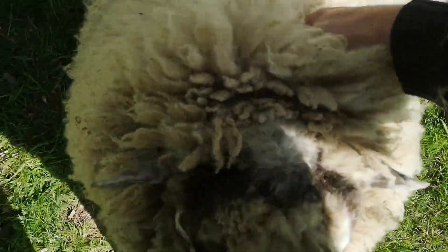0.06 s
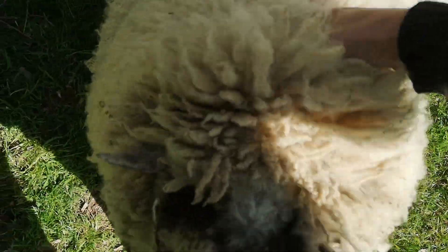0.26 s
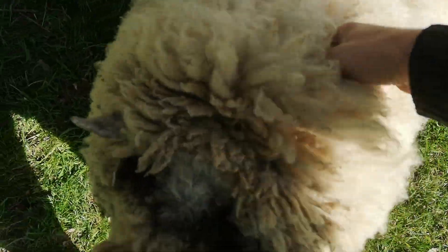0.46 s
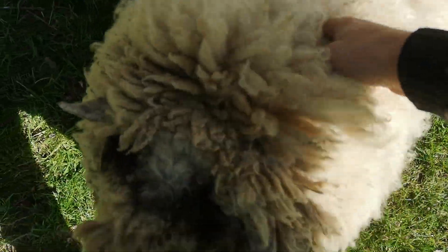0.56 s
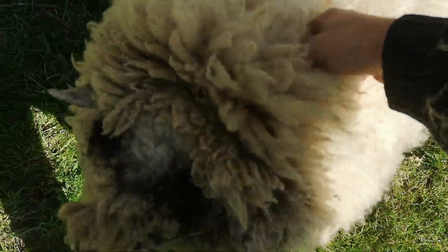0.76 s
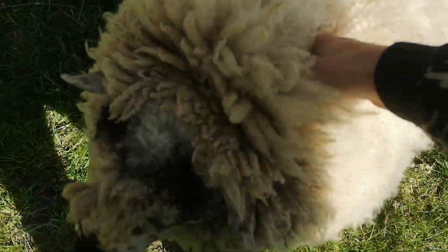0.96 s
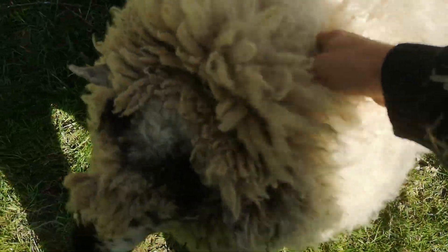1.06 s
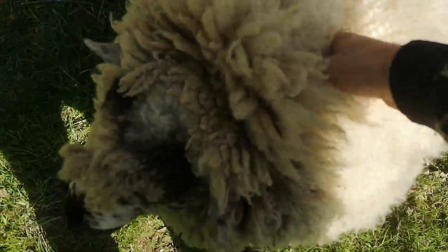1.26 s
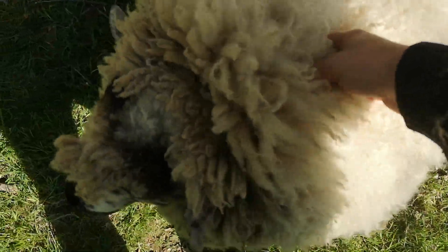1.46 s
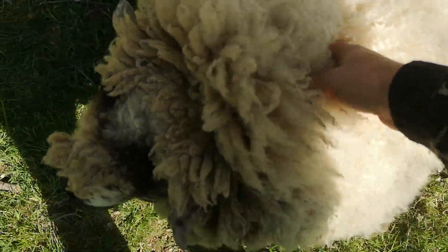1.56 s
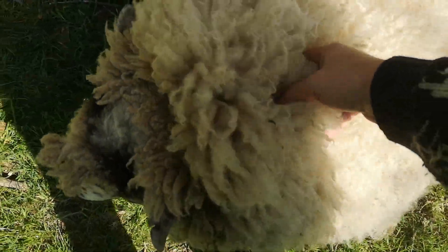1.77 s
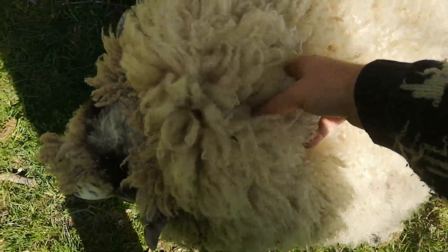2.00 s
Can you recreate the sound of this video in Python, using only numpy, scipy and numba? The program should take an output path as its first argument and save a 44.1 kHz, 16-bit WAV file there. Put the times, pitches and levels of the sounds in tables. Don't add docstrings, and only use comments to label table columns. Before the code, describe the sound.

A sheep gives one rough, trembling bleat of about a second right at the start, close to a handheld microphone in an open pasture; low wind rumble and soft knocks continue, with a sharper bump near the end.

```python
import sys
import numpy as np
from scipy import signal
from scipy.fft import rfft, irfft
from scipy.io import wavfile
from scipy.ndimage import uniform_filter1d, map_coordinates
from numba import njit

SR = 44100
rng = np.random.default_rng(int(sys.argv[2]) if len(sys.argv) > 2 else 0)


def field_ratio(decibels):
    return 10 ** (np.asarray(decibels, dtype=float) / 20)


def wav_record(signal):
    frames = np.transpose(np.atleast_2d(signal))
    bounded = np.clip(frames, -1, 1)
    quanta = np.round(bounded * 32767).astype(np.int16)
    wavfile.write(sys.argv[1], SR, quanta)


N = 89743
T = np.arange(N) / SR

# t/s, pulse rate f/Hz, effort level/dB, mouth resonance f/Hz, chest share level/dB
BLEAT = [
    (.06, 161.5, -46.5, 2160, -9.5),
    (.2, 172.6, -57.5, 2275, -9),
    (.3, 175.3, -54.5, 2260, 2),
    (.42, 180.4, -59, 2440, -4),
    (.55, 181.5, -58.5, 2466, -0.5),
    (.66, 178.9, -58, 2530, 6),
    (.75, 170.4, -61.5, 2790, 6.5),
    (.84, 167.8, -65.5, 2380, 11.5),
    (.99, 164.7, -52.5, 2104, 6),
]
MOUTH_WIDTH_HZ = 620


def level(x, db):
    return x * field_ratio(db) / np.sqrt(np.mean(x ** 2))


def curve(table, column=1):
    table = np.array(table, float)
    return np.interp(T, table[:, 0], table[:, column])


@njit
def svf(x, hz, width):
    y, b, l = np.empty(len(x)), 0., 0.
    for i in range(len(x)):
        g, k = np.tan(np.pi * hz[i] / SR), width / hz[i]
        v = (b + g * (x[i] - l)) / (1 + g * (g + k))
        b, l, y[i] = 2 * v - b, l + 2 * g * v, k * v
    return y


def band(x, hz, width_hz):
    hz = hz + np.zeros(N)
    return svf(svf(x, hz, 1. * width_hz), hz, 1. * width_hz)


def walk(rate):
    k = int(SR / rate)
    steps = np.repeat(rng.standard_normal(N // k + 1), k)
    return 0.88 * uniform_filter1d(uniform_filter1d(steps, k), k)[:N]


def coloured(colour, flicker_db, rate):
    colour, f = np.array(colour, float), np.fft.rfftfreq(N, 1 / SR) + 1
    gain_db = np.interp(np.log(f), np.log(colour[:, 0]), colour[:, 1])
    shaped = rfft(rng.standard_normal(N)) * field_ratio(gain_db)
    half_octave = 2 * np.log2(f / 16)
    out = 0
    for k in range(22):
        share = np.clip(1 - abs(half_octave - k), 0, 1)
        out = out + irfft(shaped * share, N) * field_ratio(flicker_db * walk(rate))
    return level(out, 0)


def late(x):
    return map_coordinates(x, [np.arange(N) - .00078 * SR], mode="mirror")


@njit
def folds(hz, stretch, size):
    pulses, phase, p, k = np.zeros(len(hz) + 1), np.empty(len(hz)), 0., 0
    for i in range(len(hz)):
        step = hz[i] * stretch[k] / SR
        p += step
        if p >= 1:
            p, k = p - 1, k + 1
            pulses[i] += size[k] * p / step
            pulses[i + 1] += size[k] * (1 - p / step)
        phase[i] = p
    return pulses[:-1], phase


def glottis(tremble):
    jitter, shimmer_db, breath_db, tremble_pitch = .017, 2.5, -4, .01
    chance = rng.standard_normal((600, 2)).T
    rate_hz = curve(BLEAT) * (1 + tremble_pitch * tremble)
    pulses, phase = folds(rate_hz, 1 + jitter * chance[0], field_ratio(shimmer_db * chance[1]))
    breath = np.exp(-phase / .5) * rng.standard_normal(N)
    return level(pulses - pulses.mean(), 0) + level(breath, breath_db)


def vocal_tract(source):
    # f/Hz, width f/Hz, level/dB
    throat = [
        (500, 81, -13.5),
        (1180, 170, -11),
        (1550, 220, -32),
    ]
    air_db, lips_db, tongue_db, lips_open_s = -36.5, -3, 1, .3
    mouth_hz = curve(BLEAT, column=3)
    mouth = band(band(source, mouth_hz, MOUTH_WIDTH_HZ), mouth_hz, 1400)
    air = field_ratio(air_db) * band(source, 5400, 2700)
    lips = field_ratio(lips_db) * band(source, 1.14 * mouth_hz, 340)
    tongue = field_ratio(tongue_db) * band(source, 2060, 300)
    opened = np.clip((T - BLEAT[0][0]) / lips_open_s, 0, 1) ** 2
    chest = 0
    for hz, width, db in throat:
        chest = chest + field_ratio(db) * np.sqrt(MOUTH_WIDTH_HZ / width) * band(source, hz, width)
    return mouth + air - opened * (lips + tongue) + chest * field_ratio(curve(BLEAT, column=4))


def scatter(voice):
    scatter_db, t60_s = 7, .075
    shade_hz, shade_width_hz, shade_db = 2520, 420, 3
    lag = np.arange(SR // 5) / SR
    tail = rng.standard_normal((2, len(lag))) * field_ratio(-60 * lag / t60_s)
    tail = tail / np.sqrt((tail ** 2).sum(axis=1, keepdims=True)) * field_ratio(scatter_db)
    heard = np.array([late(voice), voice]) + signal.fftconvolve(voice[None], tail)[:, :N]
    favoured = svf(heard[1], np.full(N, 1. * shade_hz), 1. * shade_width_hz)
    heard[1] = level(heard[1] + field_ratio(shade_db) * favoured, 0) * heard[1].std()
    return heard


def chest_hum():
    # t/s, f/Hz, level/dB
    hum_line = [
        (.34, 190, -57),
        (.43, 202.7, -57),
        (.52, 200.7, -66),
        (.61, 195.6, -59),
        (.72, 196, -59),
    ]
    fade = np.clip(np.minimum(T - hum_line[0][0], hum_line[-1][0] - T) / 0.049, 0, 1)
    loudness = field_ratio(curve(hum_line, column=2) + 2.89 * walk(22))
    cycles = np.cumsum(curve(hum_line) * (1 + .025 * walk(18))) / SR
    hum = np.sqrt(2) * fade * loudness * np.sin(2 * np.pi * cycles)
    return np.array([late(hum), hum])


def sheep():
    tremble_hz, tremble_peak_s, tremble_from_s, tremble_db = 16.2, .538, .238, 11
    flutter_hz, flutter_peak_s, flutter_db = 29, .2, 8
    effort_rise_s, effort_fall_s, pan_db = .2, .27, 5
    full = np.clip((T - tremble_from_s) / 0.036, 0, 1)
    tremble = (1.3 - 2 * abs(np.sin(np.pi * tremble_hz * (T - tremble_peak_s)))) * full
    flutter = np.cos(2 * np.pi * flutter_hz * (T - flutter_peak_s)) * (1 - full)
    rise = np.clip((T - BLEAT[0][0]) / effort_rise_s, 0, 1)
    fall = np.clip((BLEAT[-1][0] - T) / effort_fall_s, 0, 1)
    effort_db = curve(BLEAT, column=2) + tremble_db / 2 * tremble + flutter_db / 2 * flutter
    voice = level(vocal_tract(glottis(tremble)), 0) * rise * fall * field_ratio(effort_db)
    pan = field_ratio(np.array([[1], [-1]]) * pan_db / 2 - 6)
    return scatter(voice) * pan + chest_hum()


def knocks():
    # t/s, peak level/dB, push length t/s
    pushes = [(0.067, -32, 0.014), (0.11, -32.5, 0.02), (0.133, -38, 0.013), (0.206, -31, 0.024),
              (0.264, -25, 0.012), (0.282, -23.5, 0.0051), (.722, -26, .012), (.741, -29, 0.0063),
              (0.777, -25, 0.014), (0.801, -31, 0.015), (0.838, -25, 0.0091), (0.853, -19.5, 0.0068),
              (0.885, -19.5, 0.016), (1.132, -32, .012), (1.889, -25, 0.0089), (1.909, -17, 0.0048),
              (1.924, -24, 0.013), (1.961, -32, 0.012), (1.969, -26.5, 0.0036)]
    ring_width, edge_db, edge_share = 1, -13, 0.33
    out = 0
    for at, db, length in pushes:
        u = (T - at) / length
        swing = np.cos(np.pi * u) * np.exp(-(u / ring_width) ** 2)
        edge = field_ratio(edge_db) * np.exp(-(u / edge_share) ** 2)
        out = out - field_ratio(db) * (swing + edge)
    return out


def body_rattle():
    # t/s, level/dB, decay t/s
    rattles = [
        (.003, -46, 0.016),
        (0.264, -49, 0.034),
        (.85, -49, 0.0095),
        (1.876, -38.5, .035),
        (1.96, -56, 0.011),
    ]
    shake = 0
    for at, db, decay in rattles:
        attack = np.clip((T - at) / 0.0013, 0, 1)
        shake = shake + field_ratio(db) * attack * np.exp(-np.clip(T - at, 0, None) / decay)
    return shake * level(band(rng.standard_normal(N), 235, 132), 0)


def rumble():
    # t/s, level/dB
    gust = [(0, -46), (.1, -36), (.22, -37), (.3, -40), (.45, -44), (.69, -43), (.76, -34), (.88, -33),
            (.95, -39), (1.07, -45), (1.17, -46), (1.27, -37), (1.45, -48), (1.52, -37), (1.7, -42),
            (1.84, -39), (1.92, -37), (2.03, -42)]
    # f/Hz, level/dB per Hz
    wind = [(12, -29), (20, -4.5), (70, -5.5), (129, -15), (155, -19), (247, -31), (361, -46.5),
            (450, -60.5), (580, -76), (990, -120)]
    flicker_db, side_db = 2.5, -27
    mid = coloured(wind, flicker_db, 13.48) * field_ratio(curve(gust)) + knocks() + body_rattle()
    side = level(np.gradient(coloured(wind, flicker_db, 8.6)), 0) * field_ratio(curve(gust) + side_db)
    return np.array([late(mid) + side, mid - side])


def scuffs():
    # t/s, level/dB, length t/s, brightness level/dB
    rubs = [
        (0.02, -60, 0.015, -40),
        (0.309, -60.5, .025, -34),
        (0.347, -66.5, 0.019, -0.5),
        (.6, -78, .01, -19),
        (1.553, -78.5, .03, 2),
    ]
    # f/Hz, level/dB per Hz
    thud = [(250, -6), (420, 5.5), (750, 6), (1500, -52)]
    swish = [(900, -14), (3000, 24), (8000, -1), (16000, -32.5)]
    dull, bright = 0, 0
    for at, db, length, brightness_db in rubs:
        puff = field_ratio(db) * np.exp(-((T - at) / length) ** 2)
        dull = dull + puff
        bright = bright + puff * field_ratio(brightness_db)
    return dull * coloured(thud, 0.92, 9) + bright * coloured(swish, 0.33, 11)


def grass():
    # f/Hz, level/dB per Hz
    field = [(180, -51.5), (300, -19), (404, -7.5), (544, -1.5), (782, -4), (1470, -7), (1760, -5.5),
             (3300, -17.5), (15600, -36.5)]
    # t/s, level/dB
    swell = [
        (0.0, -75),
        (0.37, -70.5),
        (0.41, -75.5),
        (0.82, -71),
        (1.03, -80),
        (1.26, -76.5),
        (1.42, -84),
        (1.57, -76.5),
        (1.66, -81),
        (2.03, -71),
    ]
    # f/Hz, level/dB per Hz
    rustle_colour = [(210, -20), (350, -9.5), (738, -17.5), (1290, -19), (1740, -9), (2670, -22.5),
                     (5550, -31), (7870, -38), (15600, -39.5)]
    hiss = field_ratio(-67) * coloured(field, 3.6, 8.87)
    return hiss + field_ratio(curve(swell) + 11.5) * coloured(rustle_colour, 3.2, 11.9)


def pasture():
    # f/Hz, left minus right level/dB
    balance = [(60, 10.5), (110, -17), (200, 1.5), (380, -1), (700, -3), (1290, 2.5), (2380, 0.5),
               (4400, -2.5), (8120, -2.5), (15000, 3)]
    alike_hz = 700
    left, right = grass() + scuffs(), grass() + scuffs()
    f = np.fft.rfftfreq(N, 1 / SR)
    alike = 1 / (1 + (f / alike_hz) ** 3)
    pan = field_ratio(np.interp(f, *np.array(balance, float).T) / 2)
    shared = rfft(late(right)) * np.sqrt(alike)
    own = rfft(left) * np.sqrt(1 - alike)
    return np.array([irfft((shared + own) * pan, N), irfft(rfft(right) / pan, N)])


def insects():
    # f/Hz, level/dB
    whistles = [(4700, -91.5), (5001, -97), (5410, -97), (5733, -97.5)]
    from_s, rise_s, gain_db = 1.78, .1, 10
    rise = np.clip((T - from_s) / rise_s, 0, 1)
    tones = 0
    for hz, db in whistles:
        loudness = field_ratio(db + gain_db + 2 * walk(25))
        cycles = np.cumsum(hz * (1 + .0008 * walk(27))) / SR
        tones = tones + loudness * np.sin(2 * np.pi * cycles)
    return rise * tones * np.array([[1.], [.7]])


def scene():
    return sheep() + rumble() + pasture() + insects()


def roll_off(x):
    return signal.sosfilt(signal.butter(12, 15730, fs=SR, output="sos"), x)


def record(dry):
    return roll_off(dry)


dry = scene()
out = record(dry)
wav_record(out)
```